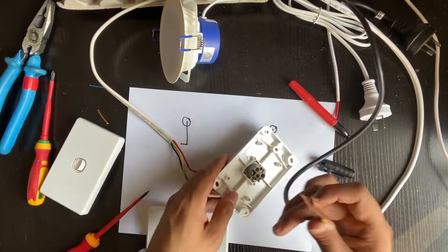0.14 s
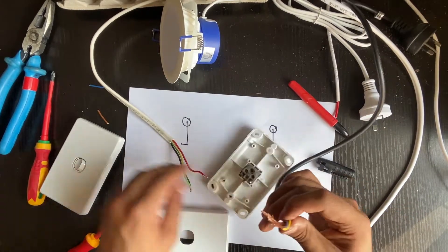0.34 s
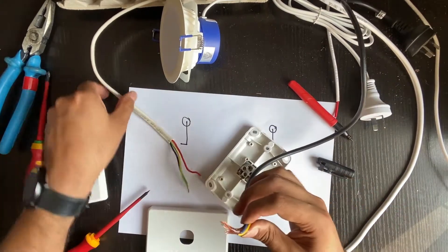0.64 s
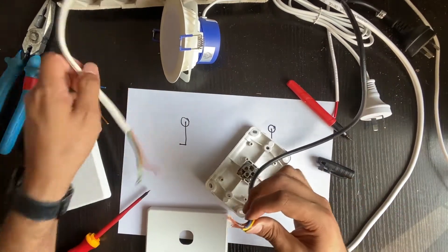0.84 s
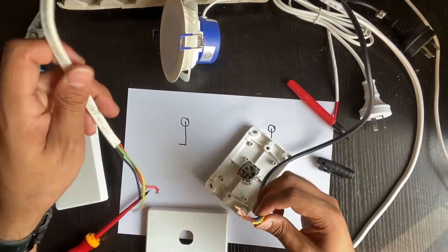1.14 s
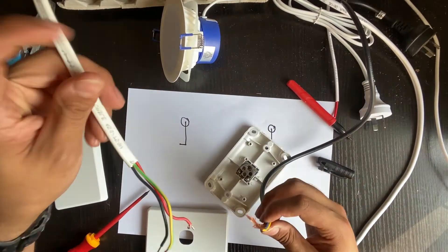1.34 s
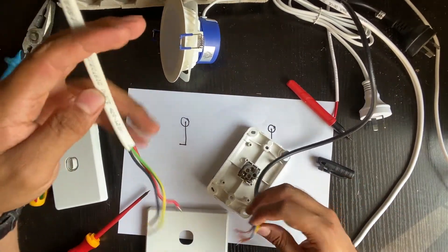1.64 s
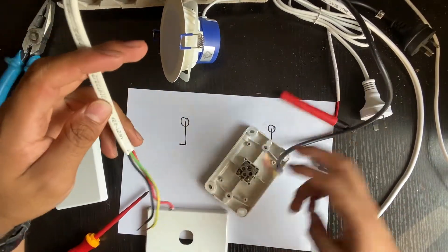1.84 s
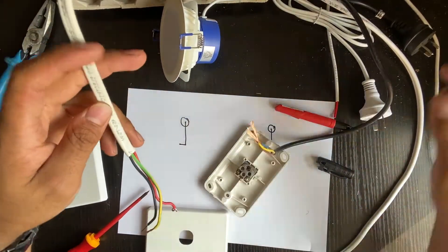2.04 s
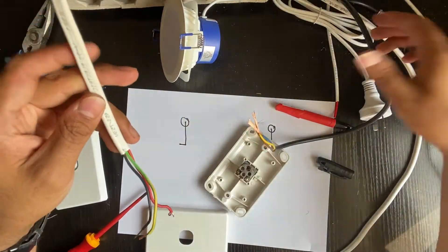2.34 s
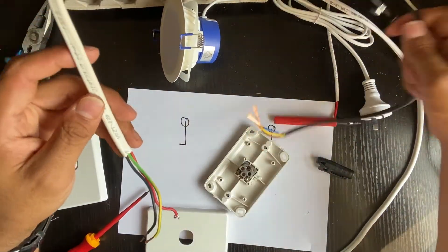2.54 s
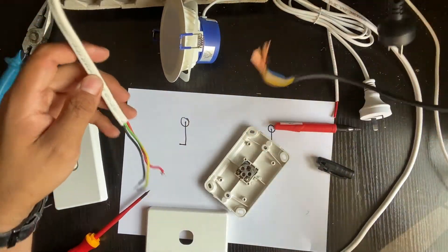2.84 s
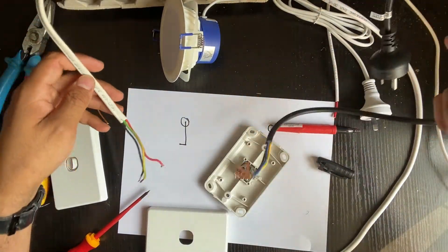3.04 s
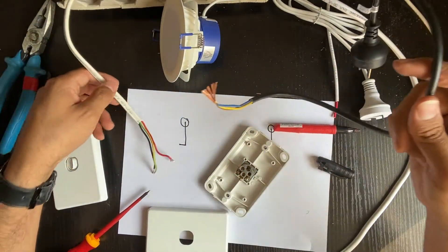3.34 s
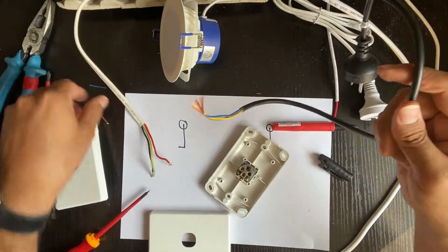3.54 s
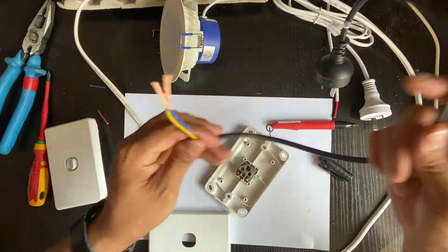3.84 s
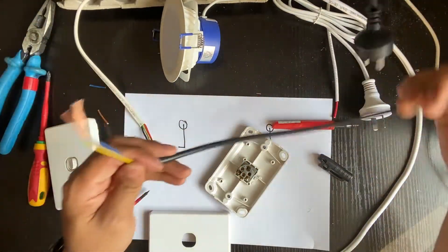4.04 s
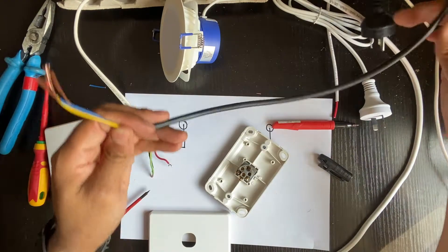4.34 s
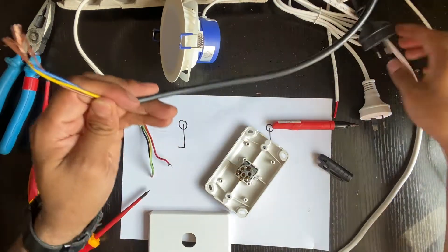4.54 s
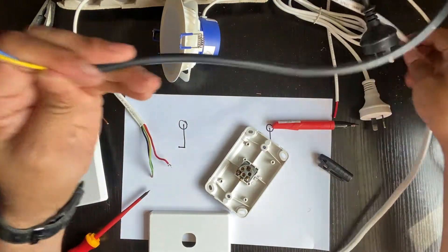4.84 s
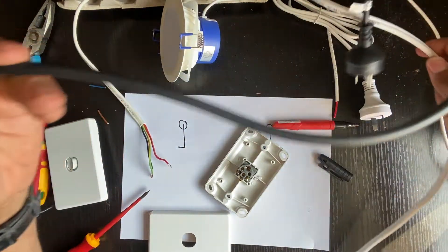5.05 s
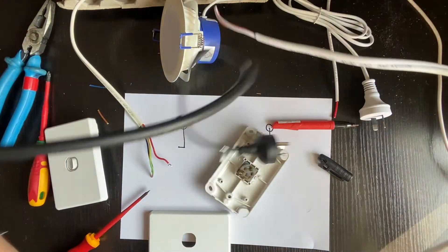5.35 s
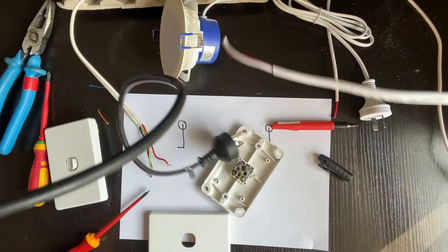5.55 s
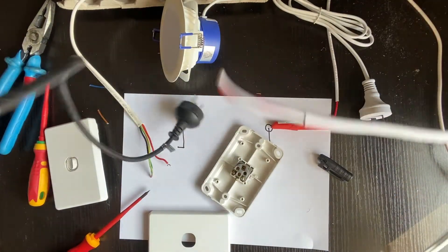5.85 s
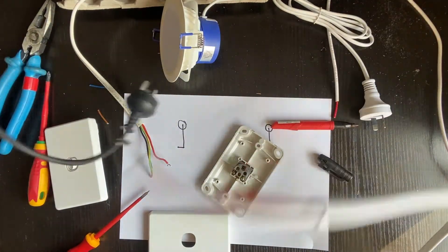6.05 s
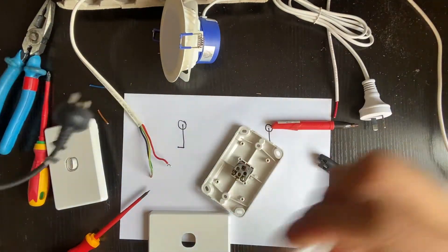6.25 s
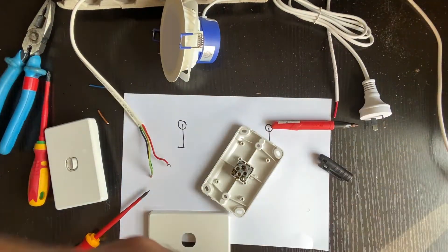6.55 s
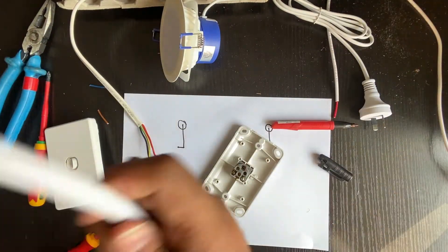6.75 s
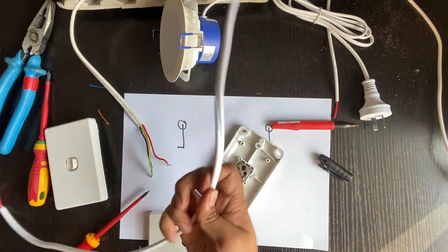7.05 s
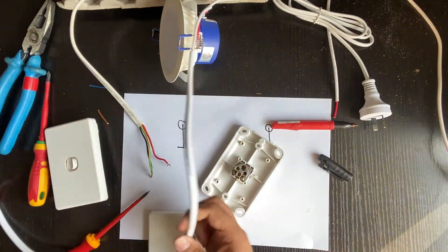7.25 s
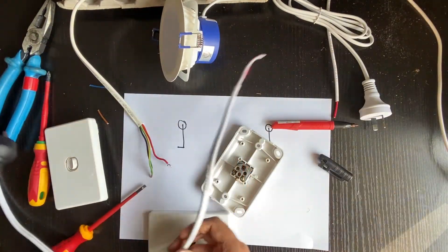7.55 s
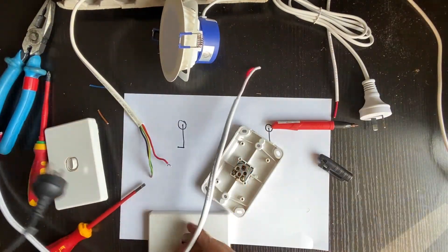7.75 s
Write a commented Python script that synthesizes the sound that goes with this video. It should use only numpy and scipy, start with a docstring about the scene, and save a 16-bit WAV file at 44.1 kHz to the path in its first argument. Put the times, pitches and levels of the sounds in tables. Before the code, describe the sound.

A hard plastic switch plate clacks onto a wooden table, cables tick and brush lightly, then a swinging plug strikes the plate with sharp loud knocks.

```python
"""Hard plastic knocks: a switch plate is put down on a wooden table, later struck by a swinging plug.
Mains cables thud, clack, tick at their wire ends and slide over paper and wood in a small room.
Blows are shaped noise bursts; friction is juddering noise with small catches; plate and table top are
resonators. Reflections and still air surround them, heard through two closely spaced microphone ports.
"""
import sys
import numpy as np
from scipy import signal
from scipy.fft import rfft, irfft, next_fast_len
from scipy.io import wavfile
from scipy.ndimage import uniform_filter1d

SR = 44100
rng = np.random.default_rng(int(sys.argv[2]) if len(sys.argv) > 2 else 0)


def unload_audio(sound):
    """Save the sound as a 16-bit wav file, at the path given as the first command line argument."""
    columns = np.transpose(np.atleast_2d(sound))
    # keep every value between -1 and 1, then stretch to whole-number steps
    steps = np.round(np.clip(columns, -1, 1) * 32767)
    wavfile.write(sys.argv[1], SR, steps.astype(np.int16))


N = 348831

# hard plastic knocks: start_s, level_db, bass_weight_db, treble_brightness_db
KNOCK_EVENTS = [(0.039, -34.5, 4, -1.5), (0.26, -34.5, -1.5, -1.5), (0.311, -39, 5.5, 4),
                (0.354, -17.5, 5.5, 2.5), (0.383, -11, -0.5, -3), (0.481, -31, 10, 11.5),
                (0.514, -35, 4, 7), (0.557, -24, -1.5, -5.5), (0.641, -32.5, -2.5, 2),
                (1.799, -27.5, -17.5, -4.5), (5.375, -9.5, -9, -6), (5.384, -12, -1, -2),
                (5.421, -16, -11, -11.5), (5.4735, -11, -7.5, -10), (5.510, -25, -3, -7.5),
                (5.537, -22, 1, 2), (7.221, -33.5, 5, 12)]
# spectrum shared by the knocks: frequency_hz, level_db_per_octave_band
KNOCK_BAND_LEVELS = [(30, -18.5), (125, -6), (290, -9.5), (450, -12.5), (840, -9.5), (1400, -8),
                     (2600, -2.5), (9200, -10), (14000, -10)]
# cables, plugs and hands landing: start_s, level_db, pitch_hz, softness_db_per_octave, thump_db
THUD_EVENTS = [(0.094, -55, 880, 10, 16.5), (0.432, -26.5, 269, 22.5, 1), (0.664, -30, 319, 4, -19),
               (0.686, -30, 314, 16, -3.5), (0.716, -33.5, 343, 10.5, -13.5), (1.16, -42, 235, 12, -11),
               (1.256, -44, 534, 4, -3.5), (1.587, -39.5, 250, 9, -1), (1.68, -41.5, 248, 35, -1),
               (1.82, -31, 280, 15, -2), (2.483, -47.5, 337.6, 5, -25), (2.526, -46.5, 310, 9, -12),
               (2.58, -32.5, 1516, 19, -22), (2.594, -32, 250, 6.5, -6), (3.436, -38, 1250, 21, -32.5),
               (3.533, -38, 420, 1, -28), (4.181, -40.5, 700, 4, -5.5), (4.502, -39.5, 419, 6.5, -9.5),
               (4.621, -45.5, 257, 9, 7), (5.686, -17.5, 278, 10.5, -2), (5.688, -25, 770, 17.5, -13),
               (5.717, -33.5, 486, 14, -7.5), (5.764, -35, 240, 10, -7), (6.028, -61, 400, 11, -2),
               (6.262, -66.5, 271, 5.5, 4), (7.041, -50.5, 1490, 24, -6.5), (7.044, -31.5, 333, 7.5, -8.5),
               (7.235, -25.5, 261, 21, -17.5), (7.393, -45, 315, 5, -4.5), (7.508, -48, 260, 19, -7),
               (7.612, -44, 129.7, 23, -2)]
# plugs and stiff cable ends hitting things: start_s, level_db, body_hz, body_db, treble_brightness_db
CLACK_EVENTS = [(1.902, -30, 280, 4, -12.5), (7.604, -36.5, 386, 2, -0.5), (7.791, -47.5, 556, 2, -12)]
# wire ends and plug pins flicking: start_s, level_db, pitch_hz, snap_db (relative to the ping)
TICK_EVENTS = [(0.864, -30.5, 1420, 6.5), (0.926, -37, 3020, 7), (0.945, -27, 4800, -2),
               (0.957, -37, 3710, 4), (0.977, -30.5, 3340, -22), (0.981, -37, 2120, 10.5),
               (1.042, -37, 1440, -8.5), (1.228, -41, 3040, -0.5), (1.41, -47, 1460, 11),
               (2.402, -61.5, 1509, 5.5), (2.751, -59, 1505, 1), (2.986, -30.5, 4080, -3),
               (2.995, -30, 3930, -12), (3.003, -42.5, 3764, 2), (3.046, -31.5, 4100, -24),
               (3.245, -35, 3830, 8), (3.255, -38, 3670, -11), (3.263, -36, 1440, 3),
               (3.495, -47.5, 2970, -5.5), (4.247, -44.5, 2237, -23), (4.429, -58, 2000, -30),
               (4.491, -51.5, 2310, -18), (4.588, -44, 2250, -17), (5.035, -49, 1345, -27),
               (5.216, -34, 3170, -4), (5.288, -39.5, 1570, 9), (5.318, -45.5, 4197, 6.5),
               (5.342, -38.5, 1270, 4), (5.451, -33, 4056, 4), (7.082, -50, 2565, -10),
               (7.162, -57, 4200, 5), (7.691, -41, 4120, -10)]
# cable and skin over paper and wood: start_s, length_s, level_db, bass_weight_db, treble_brightness_db
STROKE_EVENTS = [(0.048, 0.09, -58.5, 1, -8.5), (0.233, 0.15, -57.5, 4, -6), (0.421, 0.1, -52, 12, 5.5),
                 (0.527, 0.21, -45.5, -6.5, -16), (0.79, 0.18, -48, -6, -3.5),
                 (0.915, 0.056, -41.5, -17.5, 5), (0.995, 0.06, -38, -2, -12),
                 (1.238, 0.24, -65, 10.5, -3.5), (1.663, 0.15, -62.5, -8.5, -12.5),
                 (1.788, 0.061, -41.5, -0.5, -7.5), (2.275, 0.024, -66.5, -3, -18),
                 (2.521, 0.04, -65.5, 22, 5), (2.969, 0.095, -52.5, -19.5, -11.5),
                 (3.157, 0.12, -55.5, -8.5, -6.5), (3.227, 0.1, -49.5, -8.5, -48),
                 (3.415, 0.11, -62, -2, -7), (3.528, 0.015, -43, -4.5, -16),
                 (4.204, 0.011, -48, 0.5, -24.5), (4.599, 0.14, -59.5, 7, -12),
                 (4.842, 0.11, -56.5, -5, -4), (5.059, 0.13, -69.5, -1, -6), (5.262, 0.22, -48, -9, -14),
                 (5.423, 0.15, -46.5, 11, 0.5), (5.601, 0.14, -60.5, 6.5, -6),
                 (6.03, 0.078, -98.5, 24, 22.5), (6.27, 0.23, -80, -3.5, 1.5),
                 (7.057, 0.09, -64.5, 7.5, -12), (7.533, 0.043, -73.5, 12.5, -12.5)]
# spectrum shared by the strokes: frequency_hz, level_db_per_band
STROKE_BAND_LEVELS = [(50, -10), (220, 0), (500, -2.5), (900, -1), (2100, 1.5), (4500, 3), (9200, 3),
                      (15000, 3)]
# switch plate resonances: frequency_hz, width_hz, relative_level_db
PLATE_RESONANCES = [(1895, 60, 1), (2064, 28, 3), (2170, 32, 5), (2355, 26, 7), (2482, 28, 4),
                    (2600, 45, 5), (3303, 25, 0), (4290, 300, 3)]
# table top resonances: frequency_hz, width_hz, relative_level_db
TABLE_RESONANCES = [(65, 32, 2.5), (116.7, 6.7, 15.5), (142, 13, 15), (184.8, 17, 15.5), (262, 70, 9),
                    (297.6, 16, 17.5)]
# decay of the wall echo: frequency_hz, t60_s
WALL_DECAY = [(100, .37), (300, .33), (1000, .27), (3000, .25), (7000, .21), (14000, .17)]
# left-right likeness of echo and air: frequency_hz, correlation
STEREO_LIKENESS = [(120, .995), (300, .9), (700, .6), (1800, -.2), (10000, .5)]
# spectrum of the still air: frequency_hz, relative_level_db_per_hz
AIR_SPECTRUM = [(20, -27.5), (52, 8), (141, -11), (1100, -29), (1680, -26.5), (4870, -40), (13200, -32.5),
                (16000, -53.5)]
# response of the microphone ports: frequency_hz, gain_db
PORT_RESPONSE = [(35, -17), (60, -4), (120, 1.5), (1200, -2.5), (2300, -0.5), (4300, -3), (5400, -7.5),
                 (7000, 0), (10000, -0.5), (14300, -1.5), (15700, -20.5)]
# phase lead of left port over right: frequency_hz, lead_rad
PORT_LEAD = [(1500, 0), (2070, .5), (2650, -.9), (4100, .3), (4800, 2.4), (11000, 6.3), (16000, 9.3)]

BAND_EDGES_HZ = 31.25 * 2 ** np.arange(0, 9.1, .5)
# half-octave filters: centre_hz, filter sections
BANDS = [(np.sqrt(lo * hi), signal.butter(2, [lo, hi], "band", fs=SR, output="sos"))
         for lo, hi in zip(BAND_EDGES_HZ, BAND_EDGES_HZ[1:])]

PUSH_HZ, CRACK_HZ = 427, 4040  # a blow: push below the first, crack above the second
WEIGHT_HZ, BRIGHT_HZ = 780, 4300  # corners of contact weight (bass) and hardness (treble)
# slopes below are per octave
THUD_RISE_DB = 9.5
THUMP_HZ, THUMP_RISE_DB, THUMP_FALL_DB = 122, 6, 10.5
CLACK_HZ, CLACK_RISE_DB, CLACK_FALL_DB = 1650, 4.5, 0.5
BODY_SLOPE_DB = 13
PING_WIDTH_HZ = 2100
SNAP_HZ, SNAP_RISE_DB, SNAP_FALL_DB = 8200, 6.5, 7.5
SWELL_DB_PER_S, SAG_DB_PER_S, RELEASE_DB_PER_S = 649.5, 9.5, 329.5
PLATE_LEFT_S, PLATE_FADE_S, PLATE_SHARE = 2.27, 0.11, 0.52  # share of friction that drives the plate
MOVE_S = 0.08  # interval between sets of reflections
AIR_DB = -64.5
TREBLE_STOP_HZ = 16900


def knock_colour(hz, level_db, weight_db, bright_db):
    """One spectrum for all knocks, tipped by how heavily and how hard each lands."""
    return level_db + at_hz(KNOCK_BAND_LEVELS, hz) + touch(hz, weight_db, bright_db)


def thud_colour(hz, level_db, pitch_hz, softness_db, thump_db):
    """Dull note of the thing that lands, or the table's thump where that is stronger."""
    note = hump(hz, pitch_hz, THUD_RISE_DB, softness_db)
    thump = thump_db + hump(hz, THUMP_HZ, THUMP_RISE_DB, THUMP_FALL_DB)
    return level_db + np.maximum(note, thump)


def clack_colour(hz, level_db, body_hz, body_db, bright_db):
    """Broad, dry clack over the short hollow note of the thing that is hit."""
    clack = hump(hz, CLACK_HZ, CLACK_RISE_DB, CLACK_FALL_DB) + touch(hz, 0, bright_db)
    body = body_db + hump(hz, body_hz, BODY_SLOPE_DB, BODY_SLOPE_DB)
    return level_db + np.maximum(clack, body)


def tick_colour(hz, level_db, pitch_hz, snap_db):
    """Ping of a wire end or pin with its bright contact snap; high pings are relatively narrowest."""
    detuning = (hz ** 2 - pitch_hz ** 2) / (hz * PING_WIDTH_HZ)
    ping = -20 * np.log10(1 + detuning ** 2)
    snap = snap_db + hump(hz, SNAP_HZ, SNAP_RISE_DB, SNAP_FALL_DB)
    return level_db + np.maximum(ping, snap)


def blows(rows, colour, crack_s, contact_s, ring_db, ring_s, spot_db, size=8192):
    """A blow: one bass push, a spiky chatter with a weaker ring in the middle, a brief crack on top."""
    rows = np.array(rows)
    t = np.arange(size) / SR
    hz = np.maximum(np.arange(size // 2 + 1), 1) * SR / size
    chance = rng.standard_normal((len(rows), 3, size))
    spikes = chance[:, 0] * np.sqrt(abs(chance[:, 1]))
    decay = np.exp(-t / contact_s) + from_db(ring_db) * np.exp(-t / ring_s)
    chatter = even(spikes * decay * (1 - np.exp(-2 * t / contact_s)))
    crack = even(chance[:, 1] * np.exp(-t / crack_s) * (1 - np.exp(-t / crack_s)))
    # power shares of push and crack; chatter fills the rest
    low = 1 / (1 + (hz / PUSH_HZ) ** 4)
    high = 1 / (1 + (CRACK_HZ / hz) ** 4)
    force = np.sqrt(low) + np.sqrt(1 - low) * (np.sqrt(1 - high) * chatter + np.sqrt(high) * crack)
    # octave levels over 10 ms, converted to spectral density
    level_db = colour(hz, *rows.T[1:, :, None])
    level_db += 10 * np.log10(.01 * SR ** 2 / (2 * np.log(2) * np.maximum(hz, 50)))
    # each struck spot has its own resonances
    spots = [np.interp(2 * np.cbrt(hz), np.arange(size), own) for own in chance[:, 2]]
    level_db += spot_db * np.array(spots)
    tail_fade = np.minimum(1, 2 * (1 - t / t[-1])) ** 8
    sound = irfft(causal(level_db) * force) * tail_fade
    out = np.zeros(N + size)
    for start_s, one in zip(rows[:, 0], sound):
        start = max(0, int(start_s * SR))
        out[start:start + size] += one
    return out[:N]


def strokes_db(t, hz):
    """Friction level in one band: each stroke swells, sags while it lasts and dies away."""
    start, length, level_db, weight_db, bright_db = np.transpose(STROKE_EVENTS)[..., None]
    early = np.maximum(start - t, 0)
    held = np.clip(t - start, 0, length)
    late = np.maximum(t - start - length, 0)
    envelope_db = -SWELL_DB_PER_S * early - SAG_DB_PER_S * held - RELEASE_DB_PER_S * late
    gains = from_db(level_db + envelope_db + touch(hz, weight_db, bright_db))
    return at_hz(STROKE_BAND_LEVELS, hz) + 10 * np.log10(np.sum(gains ** 2, axis=0) + 1e-20)


def sliding(catches_per_s, catch_db, spread_db, judder_db, judder_rate, wander_db):
    """Friction: juddering hiss, with small catches of varied colour as the cable sticks and lets go."""
    t = np.arange(N) / SR
    coarse_t = t[::128]
    at = np.flatnonzero(rng.random(N) < catches_per_s / SR)
    sizes = from_db(spread_db * np.minimum(rng.exponential(1, N), 2))[at]
    hiss = rng.standard_normal((2, N)) * from_db(judder_db * drift(judder_rate))
    colours = rng.standard_normal((N // 20, len(BANDS)))[:len(at)]
    out = 0
    for k, (hz, band) in enumerate(BANDS):
        catches = np.zeros(N)
        catches[at] = sizes * colours[:, k]
        rough = hiss[k % 2] + from_db(catch_db) * rms_one(catches)
        grain = rms_one(signal.sosfilt(band, rough))
        level_db = np.interp(t, coarse_t, strokes_db(coarse_t, hz))
        out = out + from_db(level_db + wander_db * drift(30)) * grain / np.sqrt(2)
    return out


def resonate(x, modes):
    """A body gathers the energy of each spectral region into its modes, which ring on."""
    size = next_fast_len(N + SR // 2)
    hz = np.arange(size // 2 + 1) * SR / size + 1e-3
    response = 1
    for mode_hz, width_hz, db in modes:
        response = response + from_db(db) / (1 + 1j * (hz ** 2 - mode_hz ** 2) / (hz * width_hz))
    # level the response over spans of half the median mode frequency
    span = int(np.median(np.array(modes)[:, 0]) / 2 * size / SR)
    regional_power = uniform_filter1d(uniform_filter1d(abs(response) ** 2, span), span)
    return irfft(rfft(x, size) * response / np.sqrt(regional_power), size)[:N]


def room(x, early_db, early_s, late_db, bass_cut_hz, count=7):
    """Quick reflections off things on the table, then the wall echo; a cycle of sets as hands move."""
    t = np.arange(SR // 3) / SR
    noises = [np.array([stereo_noise(len(t)) for place in range(count)]) for _ in range(2)]
    near = from_db(early_db) * rms_one(np.exp(-t / early_s))
    echoes = 0
    for k, (hz, band) in enumerate(BANDS):
        walls = rms_one(from_db(-60 * t / at_hz(WALL_DECAY, hz)) * (1 - np.exp(-t / 0.003)))
        small_things = hz / np.hypot(hz, 700)  # they reflect little bass
        shape = np.hypot(small_things * near, from_db(late_db) * walls)
        shape = shape * hz / np.hypot(hz, bass_cut_hz)
        dull = 1 / np.hypot(1, hz / 6000)  # soft surfaces swallow treble
        echoes = echoes + dull * signal.sosfilt(band, noises[k % 2] * shape)
    # overlapping segments, each through the next set of reflections
    hop = int(MOVE_S * SR)
    size = next_fast_len(2 * hop + len(t))
    places = rfft(echoes / np.sqrt(len(t)), size)
    fade = signal.windows.cosine(2 * hop)
    padded = np.pad(x, (hop, 2 * hop))
    out = np.zeros((2, N + hop + size))
    for k, start in enumerate(range(0, N + hop, hop)):
        segment = rfft(padded[start:start + 2 * hop] * fade, size)
        out[:, start:start + size] += irfft(segment * places[k % count], size)
    return out[:, hop:hop + N]


def air():
    """Low rumble of the building under a faint hiss: shaped stereo noise."""
    spectrum = rfft(stereo_noise(N))
    hz = np.arange(spectrum.shape[1]) * SR / N
    shaped = irfft(spectrum * from_db(at_hz(AIR_SPECTRUM, hz)), N)
    return from_db(AIR_DB) * rms_one(shaped)


def ports(x):
    """Two ports colour the sound and set a frequency-dependent phase between left and right."""
    size = next_fast_len(N + SR // 10)
    hz = np.arange(size // 2 + 1) * SR / size
    lead_rad = np.interp(hz, *np.transpose(PORT_LEAD))
    response = from_db(at_hz(PORT_RESPONSE, hz)) * np.exp(.5j * lead_rad * [[1], [-1]])
    return irfft(rfft(x, size) * response, size)[:, :N]


def touch(hz, weight_db, bright_db):
    """Weight lifts the bass of a contact, hardness its treble (dB)."""
    return weight_db / (1 + (hz / WEIGHT_HZ) ** 2) + bright_db / (1 + (BRIGHT_HZ / hz) ** 3)


def hump(hz, centre_hz, rise_db, fall_db):
    """Broad peak in dB with a slope per octave on each side."""
    octaves = np.log2(hz / centre_hz)
    return np.where(octaves < 0, rise_db, -fall_db) * octaves


def even(force):
    """Spectra of bursts, levelled over broad regions so that only fine grain is left."""
    spectrum = rfft(force)
    return spectrum / np.sqrt(uniform_filter1d(abs(spectrum) ** 2, size=160))


def causal(gain_db):
    """Minimum-phase responses for rows of dB: nothing sounds before its cause."""
    cepstrum = irfft(np.log(from_db(gain_db)))
    half = cepstrum.shape[-1] // 2
    cepstrum[:, 1:half] *= 2
    cepstrum[:, half + 1:] = 0
    return np.exp(rfft(cepstrum))


def stereo_noise(size):
    """White noise in two channels whose likeness depends on frequency."""
    mid, side = rfft(rng.standard_normal((2, size)))
    alike = np.clip(at_hz(STEREO_LIKENESS, np.arange(len(mid)) * SR / size), 0, .999)
    spectrum = np.sqrt(1 + alike) * mid + np.sqrt(1 - alike) * side * [[1], [-1]]
    return irfft(spectrum, size) / np.sqrt(2)


def drift(rate):
    """Random curve of rms 1 with `rate` knots a second, joined by straight lines."""
    knots = rng.standard_normal(N // 8)
    return rms_one(np.interp(np.arange(N) * rate / SR, np.arange(len(knots)), knots))


def at_hz(points, hz):
    """Read a table on a log-frequency axis."""
    f, value = np.transpose(points)
    return np.interp(np.log(np.maximum(hz, 1)), np.log(f), value)


def rms_one(x):
    """Scale each row to rms 1."""
    return x / np.sqrt(np.mean(x ** 2, axis=-1, keepdims=True) + 1e-30)


def from_db(db):
    """Decibels to gain."""
    return 10 ** (np.asarray(db) / 20)


def scene():
    """Knocks and early friction ring the plate; all but the light ticks shake the table top."""
    knocks = blows(KNOCK_EVENTS, knock_colour,
                   crack_s=0.0036, contact_s=0.002, ring_db=-30, ring_s=0.02, spot_db=1.5)
    thuds = blows(THUD_EVENTS, thud_colour,
                  crack_s=0.0037, contact_s=0.0027, ring_db=-9, ring_s=0.017, spot_db=4.0)
    clacks = blows(CLACK_EVENTS, clack_colour,
                   crack_s=0.0019, contact_s=0.0026, ring_db=-17.5, ring_s=0.037, spot_db=0.1)
    ticks = blows(TICK_EVENTS, tick_colour,
                  crack_s=0.0004, contact_s=0.0003, ring_db=-26, ring_s=0.007, spot_db=2.2)
    slide = sliding(catches_per_s=150, catch_db=-1.5, spread_db=4.0,
                    judder_db=3.0, judder_rate=90, wander_db=2.45)
    # the cable drags over the plate, then leaves it
    leaving_s = [PLATE_LEFT_S, PLATE_LEFT_S + PLATE_FADE_S]
    on_plate = np.interp(np.arange(N) / SR, leaving_s, [PLATE_SHARE, 0])
    plate = resonate(knocks + on_plate * slide, PLATE_RESONANCES)
    heavy = resonate(plate + thuds + clacks + (1 - on_plate) * slide, TABLE_RESONANCES)
    heavy_echo = room(heavy, early_db=0.5, early_s=0.0062, late_db=-6.5, bass_cut_hz=100)
    tick_echo = room(ticks, early_db=2.0, early_s=.0028, late_db=-5.5, bass_cut_hz=160)
    return ports(heavy + ticks + heavy_echo + tick_echo) + air()


def record(dry):
    """Round the highest peaks and cut the top."""
    rounded = 0.84 * np.tanh(dry / 0.85)
    low_pass = signal.cheby2(14, 70, TREBLE_STOP_HZ, fs=SR, output="sos")
    return signal.sosfilt(low_pass, rounded)


dry = scene()
out = record(dry)
unload_audio(out)
```